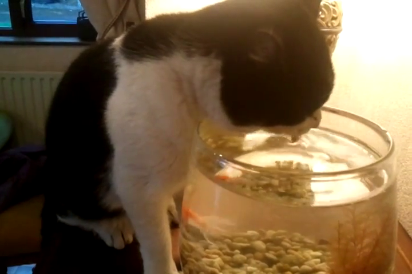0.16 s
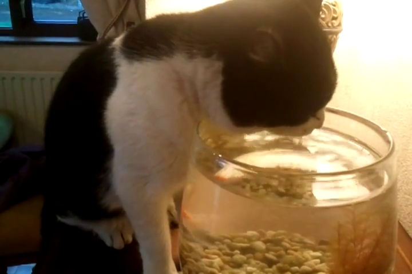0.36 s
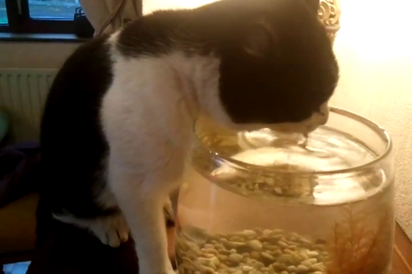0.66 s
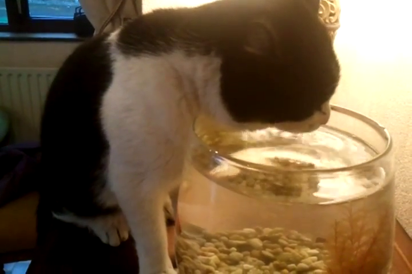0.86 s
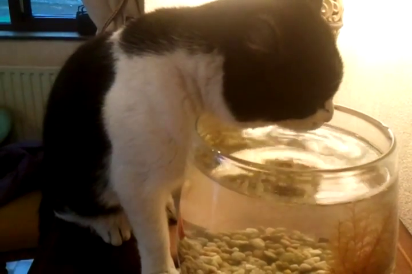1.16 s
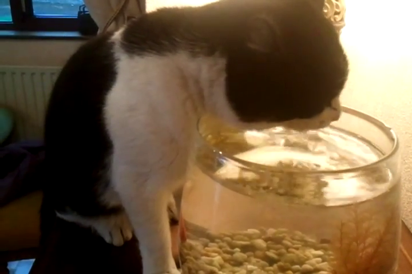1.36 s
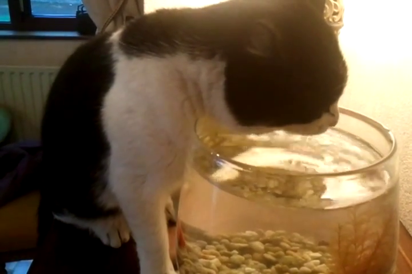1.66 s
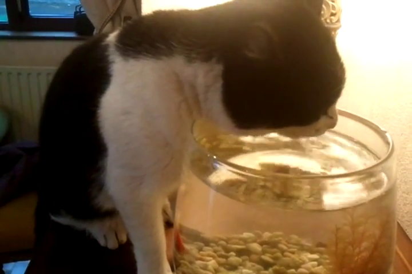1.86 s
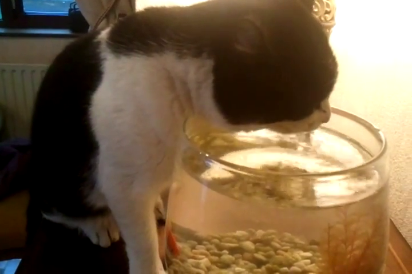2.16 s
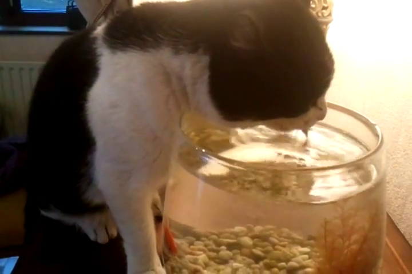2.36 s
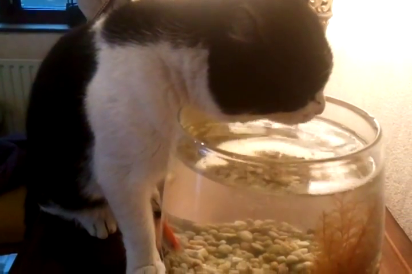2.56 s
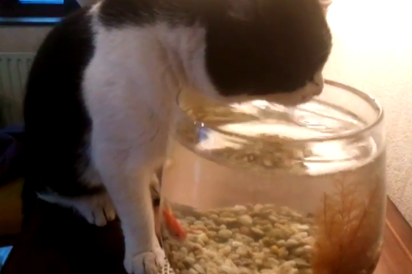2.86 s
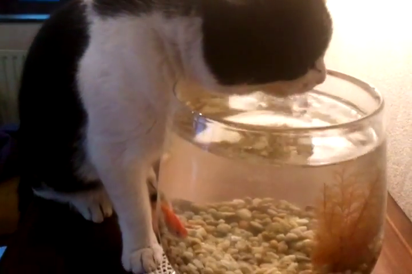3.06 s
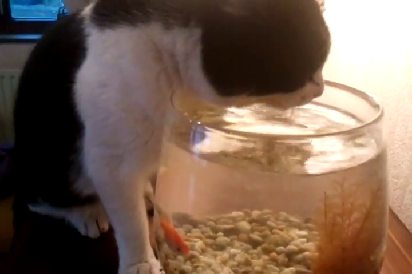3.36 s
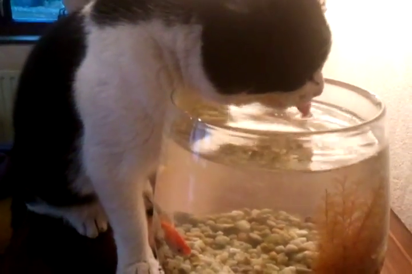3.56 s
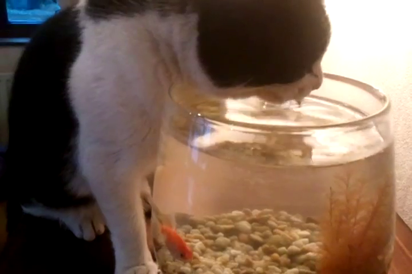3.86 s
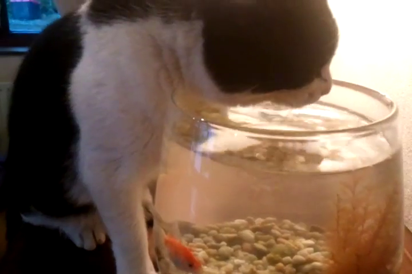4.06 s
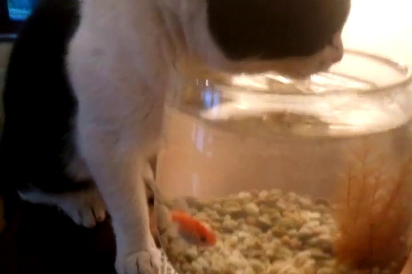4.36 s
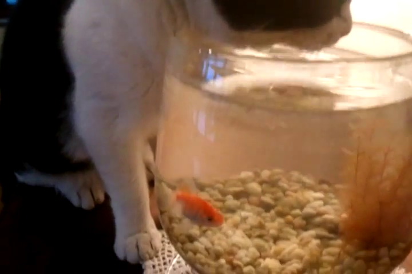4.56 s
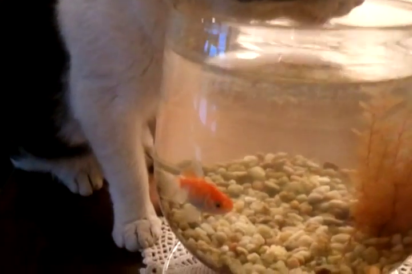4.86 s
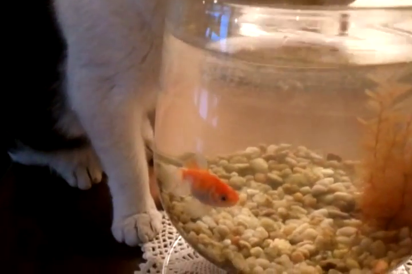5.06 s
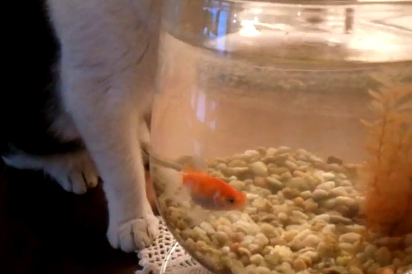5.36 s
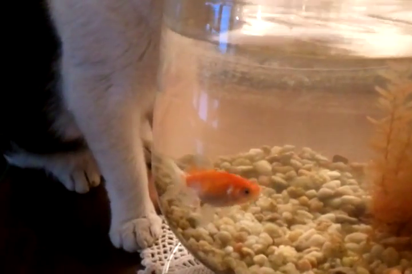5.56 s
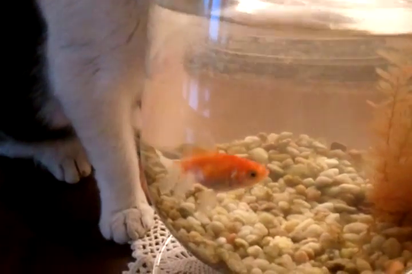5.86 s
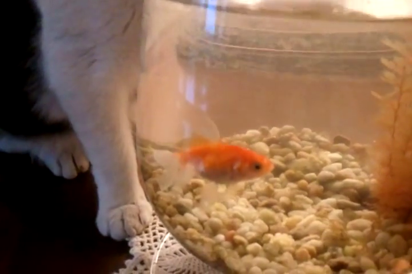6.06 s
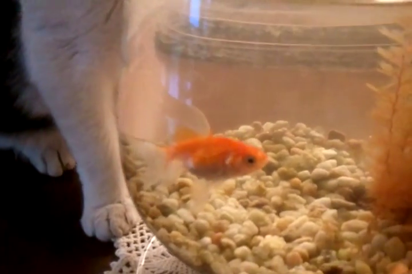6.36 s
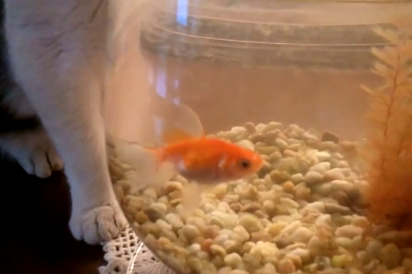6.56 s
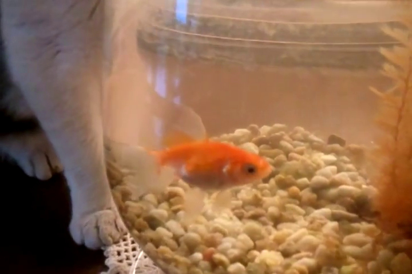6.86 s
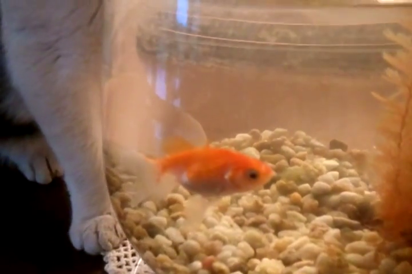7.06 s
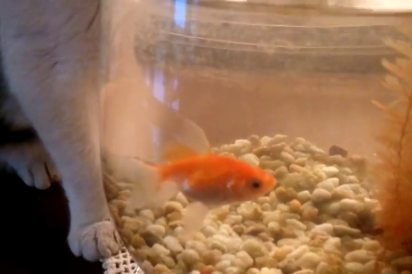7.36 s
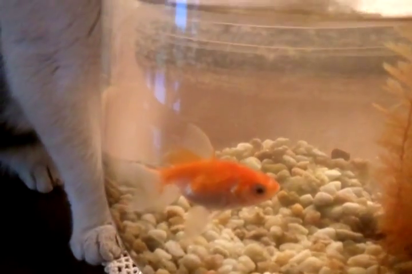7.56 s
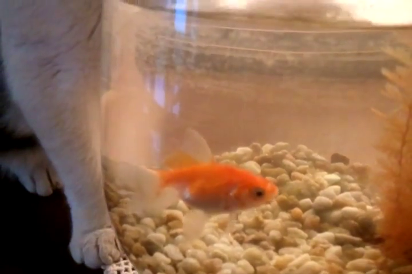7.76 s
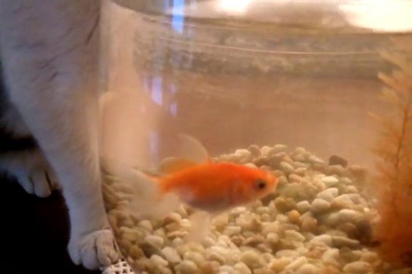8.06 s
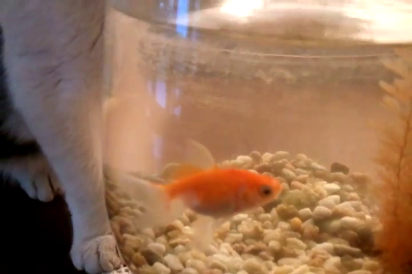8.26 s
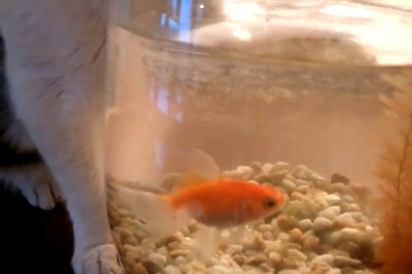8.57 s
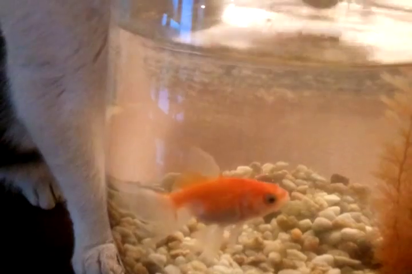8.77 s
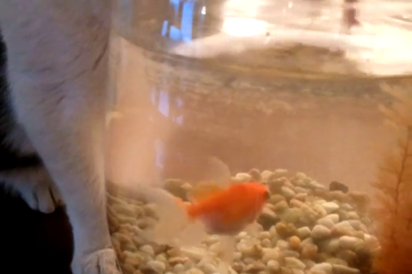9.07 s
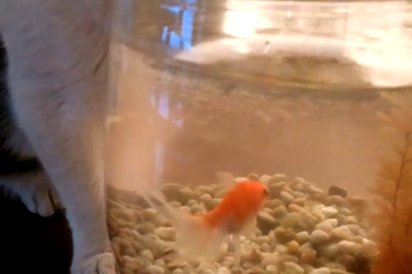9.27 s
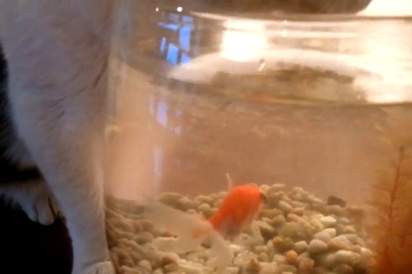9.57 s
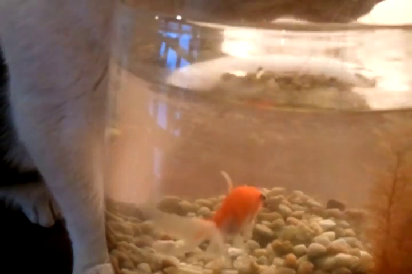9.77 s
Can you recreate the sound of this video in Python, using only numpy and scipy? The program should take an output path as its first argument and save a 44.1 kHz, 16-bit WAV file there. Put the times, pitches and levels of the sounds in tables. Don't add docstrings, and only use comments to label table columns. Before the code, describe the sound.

Close to a small hand-held microphone, a cat drinks from a glass bowl in a quiet room. About three or four quick laps a second make small hollow plops, bright droplets and thin lip ticks over steady soft hiss. Fingers shift dully at times. Late on, something plastic snaps lightly across the room, then much harder half a second later, while the lapping continues.

```python
import sys
import numpy as np
from scipy import signal
from scipy.fft import rfft, irfft, next_fast_len
from scipy.io import wavfile
from scipy.ndimage import map_coordinates

SR = 44100
rng = np.random.default_rng(int(sys.argv[2]) if len(sys.argv) > 2 else 0)


def unload_audio(sound):
    columns = np.transpose(np.atleast_2d(sound))
    steps = np.round(np.clip(columns, -1, 1) * 32767)
    wavfile.write(sys.argv[1], SR, steps.astype(np.int16))


def convert_level_to_amplitude(level_db):
    exponent = np.asarray(level_db, float) / 20
    return 10 ** exponent


N = 437913

# start in seconds, peak level in dB, pitch in Hz, t60 in ms.
TONGUE_SLAPS = [(0.6084, -29.5, 1600, 2.1), (1.1241, -30, 1120, 5.6), (1.7075, -38.5, 1210, 5.1),
                (1.9629, -29, 1020, 6), (2.278, -44, 1220, 8.8), (2.8338, -30.5, 1430, 2),
                (3.172, -39, 1640, 6.3), (3.732, -33.5, 1110, 2.6), (4.085, -52, 1110, 15),
                (4.641, -34.5, 1130, 7.7), (5.262, -34, 1120, 5.9), (5.5263, -36, 1060, 17),
                (6.449, -37.5, 1100, 24), (6.807, -45, 1090, 17), (7.114, -49, 1060, 19),
                (7.405, -41.5, 1050, 16), (7.7037, -38.5, 1040, 7.3), (8.8928, -31.5, 1015, 12),
                (9.24, -38, 1056, 18.5)]
# start in seconds, peak level in dB, pitch in Hz, t60 in ms.
TONGUE_SLIDES = [(0.334, -43, 1210, 4.9), (0.8723, -35.5, 1230, 7.4), (1.45, -39, 1160, 3.1),
                 (2.562, -39, 1100, 5.6), (3.453, -37.5, 1090, 6.7), (4.373, -42, 1150, 4.9),
                 (4.9762, -41.5, 1120, 11), (5.888, -38, 1050, 11), (6.173, -40.5, 1080, 12),
                 (8.3553, -36, 1030, 8.3), (8.6266, -38, 1080, 12), (9.5353, -37.5, 1060, 16),
                 (9.8182, -32.5, 1160, 8.8)]
# start in seconds, peak level in dB, pitch in Hz, t60 in ms.
WATER_COLUMNS = [(0.4245, -41.5, 2040, 11), (0.4357, -43, 2120, 15), (0.7004, -45.5, 2200, 9.5),
                 (.975, -46, 2220, 7), (1.2432, -37, 2050, 13), (1.2398, -39.5, 2000, 9),
                 (1.562, -46.5, 2340, 13), (1.814, -43, 2180, 9.4), (2.0743, -35.5, 2064, 20),
                 (2.6616, -46, 2150, 11), (2.9514, -31, 2090, 11), (3.2846, -43.5, 2170, 5.5),
                 (3.5725, -39.5, 2220, 9), (3.995, -43, 2150, 5.9), (4.207, -45.5, 2100, 22),
                 (4.4556, -45.5, 2080, 23), (4.4889, -39.5, 2130, 5.6), (4.7558, -39, 2000, 11),
                 (5.3797, -45.5, 2360, 8.7), (6.2002, -41, 2220, 14), (6.588, -39.5, 2150, 8.8),
                 (7.151, -39.5, 2040, 3.6), (7.5363, -45, 2400, 17), (7.878, -47.5, 2320, 28),
                 (8.209, -43, 2430, 7), (8.4738, -49, 2300, 10), (9.153, -47.5, 2360, 7.8),
                 (9.3837, -44, 2800, 9.2), (9.6455, -42.5, 2240, 9), (9.8733, -48, 2200, 12),
                 (9.907, -37.5, 2230, 9.8)]


def unit(x):
    return x / np.sqrt(np.mean(x ** 2) + 1e-20)


def along(points, hz):
    f, v = np.transpose(points)
    return np.interp(np.log(hz + 1), np.log(f + 1), v)


def curve(rows):
    return np.interp(np.arange(N) / SR, *np.transpose(rows))


def wobble(rate):
    knots = rng.standard_normal(int(N * rate / SR) + 4)
    return map_coordinates(knots, [np.arange(N) * rate / SR])


def coloured(x, spectrum):
    m = 2 * next_fast_len(N // 2 + 8192)
    gain = convert_level_to_amplitude(along(spectrum, np.fft.rfftfreq(m, 1 / SR)))
    cepstrum = irfft(np.log(gain + 1e-6), m)
    cepstrum[1:m // 2] *= 2
    cepstrum[m // 2 + 1:] = 0
    return irfft(rfft(x, m) * np.exp(rfft(cepstrum)), m)[:N]


def laid(s, shapes):
    at = np.round(s * SR).astype(int)[:, None] + np.arange(shapes.shape[1])
    return np.bincount(at.ravel(), shapes.ravel(), N + SR)[:N]


def pockets(s, db, hz, t60, rise, attack, size):
    t = np.arange(size) / SR
    hz = hz[:, None]
    age = t / (np.abs(t60[:, None]) + 1e-4)
    turns = hz * t * (1 + rise * np.minimum(age, 1))
    onset = 1 - np.exp(-t * hz / attack)
    return laid(s, convert_level_to_amplitude(db[:, None] - 60 * age ** 1.316) * onset * np.sin(2 * np.pi * turns))


def puffs(s, db, hz, t60, width, rise_s, size):
    t, f = np.arange(size) / SR, np.fft.rfftfreq(size, 1 / SR)
    hz = hz[:, None]
    resonance = 1j * f * hz / (hz ** 2 - f ** 2 + 1j * f * hz * width)
    noise = irfft(rfft(rng.standard_normal((len(s), size))) * resonance, size)
    noise /= noise.std(axis=1, keepdims=True)
    decay = convert_level_to_amplitude(db[:, None] - 60 * (t / t60[:, None]) ** 1.294)
    return laid(s, noise * decay * (1 - np.exp(-t / rise_s)))


def splash(s, db, hz, spread_s, spread_tone, cycles, count):
    lag, tone, strength = rng.standard_normal((len(s), 3, count)).transpose(1, 0, 2)
    small_s = np.clip(s[:, None] + spread_s * (1.1 + lag), 0, N / SR).ravel()
    small_hz = np.clip(hz[:, None] * np.exp(spread_tone * tone), 500, 9900).ravel()
    small_db = (db[:, None] + 3 * strength).ravel()
    return pockets(small_s, small_db, small_hz, cycles / small_hz, rise=0.063, attack=0.34, size=600)


def spit(s, db, t60):
    burst = convert_level_to_amplitude(db[:, None] - 60 * np.arange(500) / SR / t60)
    return laid(s, burst * rng.standard_normal(burst.shape))


def strokes():
    # start in seconds, peak level in dB, pitch in Hz.
    falling = [(0.8748, -37.5, 2600), (2.9516, -41, 3200), (0.3313, -42, 2620), (0.506, -47, 2080),
               (1.286, -45, 2560), (1.3635, -46.5, 2200), (1.723, -41.5, 3400), (1.829, -43, 3330),
               (2.0628, -48, 3620), (2.1941, -54, 2170), (2.29, -41.5, 3620), (2.5702, -47, 2070),
               (2.576, -41.5, 2670), (2.687, -46.5, 2310), (2.9225, -46, 2050), (2.9554, -45, 2050),
               (3.0784, -47, 2160), (3.174, -41.5, 2700), (3.374, -47.5, 2710), (3.8093, -46, 3050),
               (3.9233, -45, 3680), (4.52, -50, 2100), (5.8943, -49, 2210), (6.4828, -49, 3060),
               (6.6474, -46.5, 2750), (6.729, -50, 2900), (7.2558, -45.5, 2530), (8.2788, -47, 2820),
               (8.635, -45, 2310), (8.8162, -48, 2780)]
    # start in seconds, pitch in Hz.
    faintest = [(0.061, 2350), (0.157, 2580), (0.882, 2670), (1.1927, 3010), (1.4542, 3820), (1.51, 3730),
                (1.578, 3280), (1.798, 2400), (2.0398, 3620), (2.231, 3700), (2.417, 2500), (2.746, 2370),
                (3.651, 2540), (4.7066, 2970), (5.67, 3040), (6.7239, 2280), (9.066, 2290), (9.45, 2750),
                (9.666, 3200), (6.085, 2400), (1.119, 3600), (1.128, 3500), (2.428, 2500), (5.266, 3000),
                (5.891, 3100), (8.658, 3000), (2.794, 3900)]
    # start in seconds, peak level in dB, pitch in Hz.
    late_pockets = [(1.2018, -41.5, 1210), (1.724, -41.5, 1820), (2.7916, -38.5, 1830), (4.405, -46, 1090),
                    (4.737, -38.5, 1750), (5.547, -39, 1230), (5.6227, -39, 1130), (6.1987, -36.5, 1110),
                    (6.483, -38, 1840), (6.533, -37.5, 1200), (6.885, -43, 1230), (8.6579, -37.5, 940),
                    (8.971, -42, 1260), (9.3125, -41.5, 1750), (9.8408, -41, 950)]
    # start in seconds, peak level in dB, pitch in Hz, t60 in ms.
    loose_parts = [(7.446, -38, 296, 21), (7.455, -39.5, 380, 12), (7.4598, -26.5, 3830, 5.8),
                   (7.4598, -36, 6300, 3.7), (7.981, -38, 420, 92), (7.982, -35.5, 750, 43),
                   (7.9922, -20.5, 3700, 4.5), (7.9918, -22, 5000, 6), (7.987, -28, 5000, 9.8),
                   (7.467, -41, 6200, 21), (7.984, -31, 1600, 14), (8.051, -41, 2000, 13),
                   (8.06, -40.5, 1150, 30), (8.091, -40, 1900, 14)]
    drop_cycles, burp_cycles = 19.2, 8.6
    crown_db, crown_pitch = -15, 1.65

    listed = TONGUE_SLAPS + TONGUE_SLIDES
    s, db, hz, ms = np.transpose(listed)
    lag, tone, strength = rng.standard_normal((len(s), 3)).T
    edge_db = -48 + 0.69 * (db + 35.5) + 2 * strength
    edge = [s + .004 + 0.0011 * lag, edge_db, 2710 * np.exp(0.094 * tone), 5.2 + 0 * s]
    gurgle = [(s - .0085, -45, 1050, 24) for s, *_ in TONGUE_SLIDES]
    crown = [(s, db + crown_db, crown_pitch * hz, 1000 * drop_cycles / hz / crown_pitch)
             for s, db, hz, _ in WATER_COLUMNS]
    all_drops = falling + [(s, -48, hz) for s, hz in faintest]
    drops = [(s, db, hz, 1000 * drop_cycles / hz) for s, db, hz in all_drops]
    burps = [(s, db, hz, 1000 * burp_cycles / hz) for s, db, hz in late_pockets]
    rows = listed + WATER_COLUMNS + loose_parts + gurgle + crown + drops + burps
    return np.hstack([np.transpose(rows), edge])


def lapping():
    s, db, hz, ms = strokes()
    ring = pockets(s, db + 3, hz * .97, ms / 1000, rise=.06, attack=.6, size=1400)
    skin = spit(s, db - 14.0 + 5 * np.log2(hz / 3000), t60=0.011)
    slop = puffs(s, db - 14, 0.94 * hz, 0.033 + 0 * s, width=0.45, rise_s=0.0014, size=3000)
    thrown = splash(s, db - 19, 1.54 * hz, spread_s=0.0054, spread_tone=0.33, cycles=8.4, count=12)
    return ring + skin + slop + thrown


def wake():
    s, db, *_ = np.transpose(TONGUE_SLAPS + TONGUE_SLIDES)
    s = s + .0035
    db = -53.5 + 0.64 * (db + 36.0)
    hz = 3000 + 0 * s
    sheet = puffs(s, db, hz, 0.028 + 0 * s, width=.8, rise_s=0.002, size=2000)
    return sheet + splash(s, db + 3.0, hz, spread_s=.004, spread_tone=.25, cycles=7, count=4)


def films():
    # start in seconds, peak level in dB, pitch in Hz.
    lip_films = [(0.5046, -39, 5800), (0.551, -31, 5030), (0.6208, -34.5, 3640), (0.6222, -39, 5740),
                 (0.8206, -34.5, 5600), (1.3633, -40, 5700), (1.3994, -38.5, 5700), (1.4568, -37.5, 5960),
                 (1.5095, -35, 5480), (1.7239, -43, 5770), (2.2904, -39.5, 6070), (2.486, -43, 6000),
                 (2.5882, -42.5, 6070), (3.1755, -28, 5860), (3.237, -38, 5870), (3.7029, -43, 6330),
                 (4.4683, -43, 6460), (4.4764, -39, 6600), (4.556, -43, 5440), (4.756, -35, 3450),
                 (5.8996, -39, 5560), (6.4636, -41, 6030), (6.4836, -40.5, 4480), (7.6619, -43, 6420),
                 (7.7109, -37, 5900), (9.247, -39, 5430), (9.3128, -44, 4820), (9.5573, -41.5, 6060),
                 (9.8732, -43.5, 5380)]
    # start in seconds, peak level in dB, lower pitch in Hz.
    lip_smacks = [(0.278, -50, 6600), (0.4242, -45, 6700), (0.4353, -45, 7190), (0.5518, -44, 6550),
                  (0.7027, -41, 7400), (1.8703, -43, 7250), (2.568, -43, 7250), (2.845, -35.5, 6300),
                  (3.574, -45, 6900), (4.207, -43, 6960), (4.7372, -33, 6560), (6.484, -44, 7240),
                  (7.143, -47, 7190), (7.5356, -47, 6800), (7.881, -44, 7040), (8.635, -49, 7100),
                  (9.313, -40, 7100), (9.6456, -46, 7020), (9.827, -38, 6800), (1.577, -48, 7300),
                  (2.686, -48, 7300), (7.933, -49, 7200)]
    # start in seconds, level
    # in dB, lower pitch in Hz.
    more_smacks = [(0.7165, -59, 7360), (1.2876, -61, 7300), (1.814, -61, 7470), (1.8838, -62, 7320),
                   (2.1941, -66, 7390), (2.2908, -58, 7320), (2.5639, -63, 7690), (2.5698, -53.5, 7320),
                   (3.175, -55, 7320), (3.5798, -61, 7450), (3.5971, -66, 7470), (4.2134, -63, 7300),
                   (4.649, -59, 7490), (6.483, -53, 7340), (6.6461, -63, 7280), (7.712, -57, 7410),
                   (7.8798, -57, 7410), (8.3626, -61, 7390), (8.6327, -60, 7320), (9.3126, -57, 7300)]
    # start in seconds, peak level in dB, pitch in Hz.
    thin_skins = [(0.2774, -49, 5230), (0.5194, -51, 4500), (0.8417, -53, 5510), (1.0432, -51, 5040),
                  (1.0785, -53, 5250), (1.1406, -52, 5990), (1.5173, -48, 6050), (2.1944, -50, 5840),
                  (2.3707, -50, 6070), (2.7515, -48, 6050), (2.7924, -49, 6220), (3.3735, -52, 5100),
                  (3.7312, -50, 5100), (3.8554, -48, 5600), (4.4444, -51, 4370), (4.4848, -49, 6400),
                  (4.4932, -51, 6610), (4.9568, -48, 5400), (5.0394, -53, 4590), (5.8024, -47, 5560),
                  (6.8283, -51, 5620), (7.1425, -47, 5250), (7.4685, -32, 5020), (7.6453, -51, 5380),
                  (8.3702, -50, 5190), (8.8114, -51, 5210), (9.8351, -51, 6610), (9.8416, -51, 5430)]
    # start in seconds, pitch in Hz.
    whisker_beads = [(1.886, 6160), (2.074, 6290), (2.2315, 5940), (2.576, 5860), (2.661, 3550),
                     (3.0842, 5430), (3.1884, 5300), (3.5395, 5760), (5.5384, 5600), (5.6507, 5600),
                     (5.723, 4260), (5.78, 4820), (6.087, 5700), (6.1844, 6150), (6.3675, 4800),
                     (6.4708, 6040), (6.8856, 4800), (7.1495, 5340), (7.4407, 5460), (7.72, 6630),
                     (7.933, 4800), (7.972, 5810), (8.207, 3200), (8.8941, 5430), (9.001, 6100),
                     (9.187, 5360), (9.1525, 5430), (9.73, 5300), (1.167, 5800), (2.31, 5600),
                     (2.954, 5600), (2.686, 5700)]

    smacks = lip_smacks + [(s, db + 13, hz) for s, db, hz in more_smacks]
    upper = [(s, db + 0.5, 8800) for s, db, hz in smacks]
    skins = [(s, db + 1, hz) for s, db, hz in thin_skins]
    beads = [(s, -44.5, hz) for s, hz in whisker_beads]
    s, db, hz = np.transpose(lip_films + smacks + upper + skins + beads)
    tick_db = db - 1.5 + 3.5 * (hz > 6900)
    tick = pockets(s, tick_db, hz, .0052 + 0 * hz, rise=0.0054, attack=0.79, size=700)
    burst = spit(s, db - 8.0 + 6 * np.log2(hz / 6000), t60=0.025)
    treble = np.diff(burst, n=2, prepend=[0, 0])
    stutter = splash(s + .002, db - 14, hz, spread_s=.003, spread_tone=.06, cycles=24, count=5)
    return tick + treble + stutter


def droplets():
    # start in seconds, peak level in dB, pitch in Hz.
    low_gulps = [(0.5991, -48, 930), (0.8943, -48, 1010), (2.0399, -48, 1160), (2.2862, -47, 1180),
                 (2.5737, -48, 950), (3.2269, -50, 1510), (3.484, -50, 1100), (3.8095, -48, 1140),
                 (3.8157, -47, 1310), (5.0441, -49, 1060), (5.2531, -47, 1080), (5.2827, -46, 1160),
                 (5.9489, -47, 840), (5.9767, -48, 1030), (6.4433, -45, 1180), (6.6618, -49, 1060),
                 (6.8009, -48, 1030), (6.9009, -48, 980), (7.6928, -48, 1030), (7.7913, -46, 1360),
                 (7.8786, -48, 1530), (8.1369, -49, 970), (8.3809, -45, 1010), (8.9612, -48, 1230),
                 (9.33, -48, 1010)]
    # start in seconds, peak level in dB, pitch in Hz.
    thrown_drops = [(0.3371, -45, 2050), (0.7159, -48, 2000), (0.8888, -47, 2630), (0.8946, -49, 2070),
                    (1.3528, -47, 2150), (1.3984, -47, 3620), (1.5177, -48, 3700), (1.8714, -47, 2350),
                    (1.8829, -49, 2110), (2.0501, -48, 2020), (2.4271, -46, 3450), (2.5644, -42, 2610),
                    (2.5864, -42, 2690), (2.614, -48, 2070), (3.304, -48, 2280), (3.5599, -44, 2070),
                    (3.7503, -48, 2020), (3.7694, -45, 2110), (4.397, -46, 2000), (4.4087, -48, 2070),
                    (4.6623, -49, 2240), (4.9898, -49, 3010), (5.0305, -47, 3210), (5.0395, -46, 3680),
                    (5.2778, -48, 2220), (6.1817, -43, 3100), (6.3676, -47, 2820), (6.6911, -51, 2780),
                    (6.9649, -45, 2350), (7.473, -40, 3810), (7.4973, -42, 2280), (7.505, -44, 2280),
                    (7.8883, -47, 2280), (8.1231, -45, 2000), (8.3622, -48, 2300), (8.3704, -48, 2930),
                    (8.639, -43, 2330), (8.6524, -47, 2130), (8.7246, -47, 3100), (8.971, -47, 3550),
                    (9.0018, -46, 3900), (9.2483, -45, 2860), (9.5461, -49, 2200), (9.8427, -45, 2200),
                    (9.8585, -49, 3060)]
    gulps = [(s, db + 1.5, hz) for s, db, hz in low_gulps]
    drops = [(s, db + 0.5, hz) for s, db, hz in thrown_drops]
    s, db, hz = np.transpose(gulps + drops)
    ring = pockets(s, db, hz, 16 / hz, rise=.04, attack=.9, size=1200)
    return ring + puffs(s, db - 14.5, hz, 0.022 + 0 * s, width=.4, rise_s=.0012, size=1500)


def afterdrips():
    s, db, hz, _ = np.transpose(WATER_COLUMNS)
    return splash(s, db / 2 - 35.5, hz, spread_s=.022, spread_tone=.12, cycles=17.6, count=3)


def spray(count=5000):
    tone, strength = rng.standard_normal((count, 2)).T
    s = rng.uniform(0, N / SR, count)
    hz = np.clip(2200 * np.exp(0.644 * tone), 600, 9800)
    since = s[:, None] - np.transpose(TONGUE_SLAPS + TONGUE_SLIDES)[0]
    stir = np.sum(np.exp(-np.abs(since) / np.where(since > 0, .03, .012)), axis=1)
    calm_db = -65.5
    db = calm_db + 4 * np.clip(strength, -2, 3) + 20 * np.log10(1 + 4 * stir)
    return pockets(s, db, hz, 12 / hz, rise=0.084, attack=0.84, size=500)


def fizz(count=170):
    when, size = rng.uniform(0, 1, (count, 2)).T
    ticks = spit(when * N / SR, -56 - 1.5 * np.log(size + .08), t60=0.015)
    return np.diff(ticks, prepend=0)


def snap(steps, colour):
    s, db, ms = np.transpose(steps)[:, :, None]
    t = np.arange(3000) / SR
    envelope = convert_level_to_amplitude(db - 60000 * t / ms) * (1 - np.exp(-t / 0.00063))
    cracks = envelope * np.sign(rng.standard_normal((len(s), len(t))))
    return coloured(laid(s[:, 0], cracks), colour)


def small_snap():
    # start in seconds, level in dB, t60 in ms.
    steps = [
        (7.439, -45.5, 59),
        (7.4597, -31.5, 12),
        (7.467, -33.5, 23),
        (7.477, -52, 27),
    ]
    # frequency in Hz, level in dB per Hz.
    colour = [(150, -30), (400, -24), (900, -3), (1800, -1), (3700, -1), (6100, -1), (10000, 1)]
    return convert_level_to_amplitude(2.5) * snap(steps, colour)


def big_snap():
    # start in seconds, level in dB, t60 in ms.
    steps = [
        (7.9788, -24.5, 120),
        (7.983, -28, 30),
        (7.9875, -28, 30),
        (7.992, -25, 14),
        (8.001, -27, 22),
    ]
    # frequency in Hz, level in dB per Hz.
    colour = [(150, -29), (400, -9), (600, -18), (760, -5.5), (1100, -12), (1600, -4), (2450, -8.5),
              (4000, -5), (6300, -8.5), (10000, -8)]
    return convert_level_to_amplitude(11.5) * snap(steps, colour)


def grip():
    # start in seconds, level in dB, resonance in Hz, t60 in ms.
    shifts = [(0.0, -51, 210, 210), (0.503, -41, 236, 200), (4.73, -57, 150, 210), (5.226, -43.5, 222, 134),
              (5.29, -56, 150, 270), (5.6, -56, 150, 210), (5.77, -52.5, 178, 220),
              (6.001, -41.5, 294, 180), (6.015, -55.5, 70, 390), (6.31, -53.5, 303, 230),
              (6.721, -52.5, 207, 230), (6.729, -48, 376, 190), (7.054, -49, 201, 210),
              (8.949, -55, 151, 200), (0.51, -50, 520, 120), (2.9, -56, 150, 220), (3.8, -57, 150, 200),
              (5.56, -60, 65, 250), (5.78, -60, 65, 250)]
    s, db, hz, ms = np.transpose(shifts)
    rubbing = puffs(s, db + 2.5, hz, ms / 1000, width=0.46, rise_s=0.011, size=11000)
    return coloured(rubbing, [(30, -11), (120, -1.5), (700, -1), (1500, -9), (8000, -74)])


def rustle():
    # centre in seconds, level in dB, half length in seconds.
    brushes = [
        (4.46, -62, 0.21),
        (0.065, -62.5, 0.09),
        (5.44, -59, 0.15),
        (6.67, -57.5, 0.11),
    ]
    # frequency in Hz, level in dB per Hz.
    cloth = [(600, -24.5), (1500, -2), (3000, -3), (5500, -7.5), (9000, -5)]
    t = np.arange(N) / SR
    level = convert_level_to_amplitude(-74) + sum(convert_level_to_amplitude(db) * np.exp(-((t - s) / half) ** 2) for s, db, half in brushes)
    return level * convert_level_to_amplitude(2.9 * wobble(60)) * unit(coloured(rng.standard_normal(N), cloth))


def room(x):
    # frequency in Hz, t60 in seconds.
    decay_times = [(250, 0.53), (1000, 0.41), (3000, 0.33), (6000, 0.27), (10000, 0.2)]
    hz, t, z = signal.stft(rng.standard_normal(SR // 2), SR, nperseg=256)
    decay = convert_level_to_amplitude(-60 * t / along(decay_times, hz)[:, None])
    tail = signal.istft(z * decay, SR, nperseg=256)[1]
    delayed = np.pad(x, (220, 0))
    return signal.fftconvolve(delayed, tail / np.linalg.norm(tail))[:N]


def hiss():
    # time in seconds, level in dB.
    levels = [
        (0.0, -54.5),
        (3.57, -55.5),
        (6.53, -53.5),
        (9.26, -55.5),
        (9.93, -55),
    ]
    # frequency in Hz, level in dB per Hz.
    air = [(15, -37), (25, -31.5), (43, -15.5), (125, -1.5), (218, 2.5), (1010, -1.5), (1670, -5),
           (2150, -5), (6190, -10), (7200, -19), (8050, -36), (8600, -31.5), (9260, -33), (10200, -49.5),
           (13300, -79), (22000, -120)]
    level = convert_level_to_amplitude(curve(levels) - 0.5 + 0.48 * wobble(6))
    return level * unit(coloured(rng.standard_normal(N), air))


def scene():
    # frequency in Hz, gain in dB.
    microphone = [(40, -27.5), (130, 0), (6200, 5), (7100, -2), (8000, -20.5), (8700, -15), (9500, -23),
                  (10150, -35.5), (10450, -81.5)]
    cat = lapping() + films() + spray() + fizz() + afterdrips() + droplets() + wake()
    small, big = small_snap(), big_snap()
    near = convert_level_to_amplitude(-16) * room(cat)
    far = convert_level_to_amplitude(1.5) * room(small) + convert_level_to_amplitude(-5) * room(big)
    airborne = coloured(cat + near + small + big + far + rustle(), microphone)
    return (airborne + grip() + hiss())[None]


def roll_off(x):
    return signal.sosfilt(signal.butter(12, 10390, fs=SR, output="sos"), x)


def record(dry):
    return roll_off(dry)


dry = scene()
out = record(dry)
unload_audio(out)
```